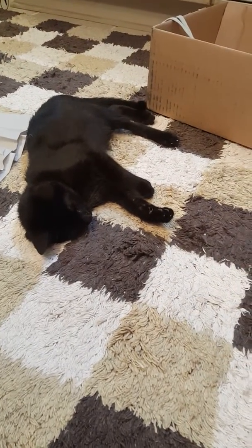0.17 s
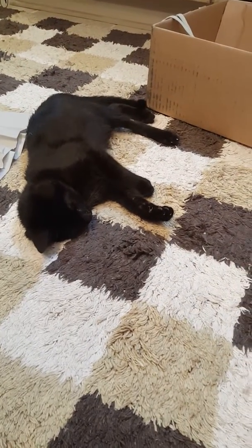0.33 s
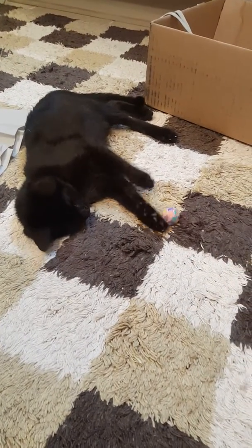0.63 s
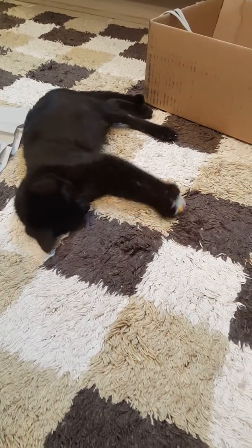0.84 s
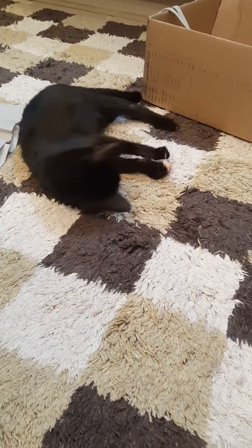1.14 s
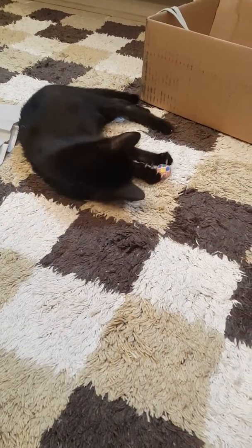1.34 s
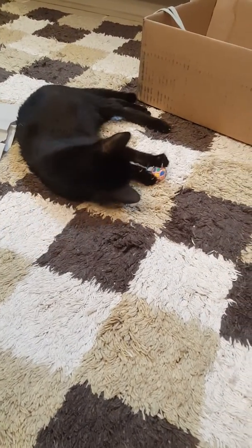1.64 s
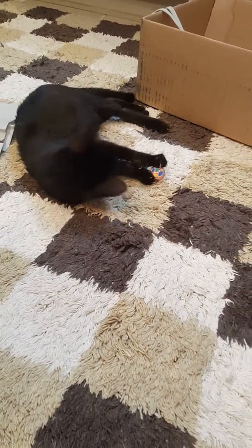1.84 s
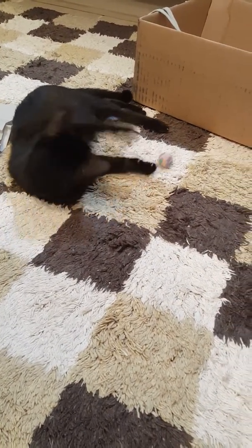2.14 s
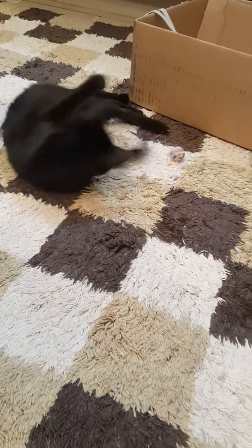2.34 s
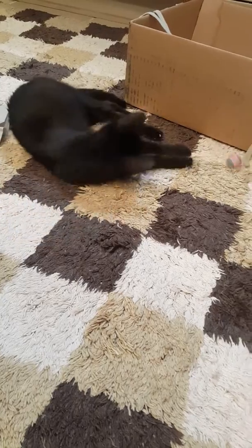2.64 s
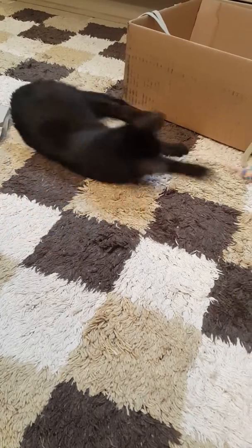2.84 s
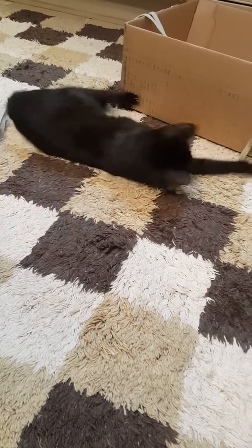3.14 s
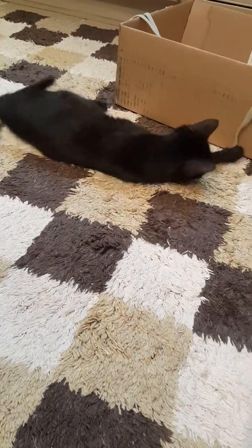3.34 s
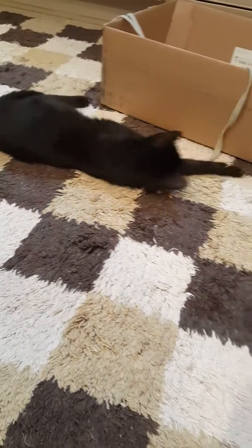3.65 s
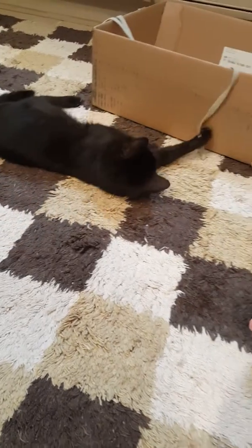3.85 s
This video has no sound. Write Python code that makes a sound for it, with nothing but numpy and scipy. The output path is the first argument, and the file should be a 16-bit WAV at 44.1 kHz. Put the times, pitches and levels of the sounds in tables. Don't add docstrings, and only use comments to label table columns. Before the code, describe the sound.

A cat purrs steadily on a rug, then paws and a ball knock a cardboard box.

```python
import sys
import numpy as np
from scipy import signal
from scipy.fft import rfft, irfft
from scipy.io import wavfile
from scipy.ndimage import uniform_filter1d

SR = 44100
rng = np.random.default_rng(int(sys.argv[2]) if len(sys.argv) > 2 else 0)


def undo_db(level):
    steps = np.asarray(level, float) / 20
    return 10 ** steps


def log_audio(samples):
    frames = np.atleast_2d(samples).T
    limited = np.clip(frames, -1, 1)
    pcm = np.round(limited * 32767).astype(np.int16)
    wavfile.write(sys.argv[1], SR, pcm)


N = 176400


def evened(x):
    return x / np.sqrt(np.mean(x ** 2) + 1e-20)


def read(points, hz):
    f, value = np.transpose(points)
    return np.interp(np.log(hz + 1), np.log(f + 1), value)


def add(mix, s, sound):
    part = mix[round(s * SR):][:len(sound)]
    part += sound[:len(part)]


def rings(table, t):
    return sum(undo_db(db - 60 * t / max(t60, .002)) * np.sin(2 * np.pi * hz * t) for hz, db, t60 in table)


def hush():
    # frequency in Hz, level in dB.
    hush_colour = [(30, 1), (70, -5.5), (130, 3), (320, -7), (720, -11.5), (1000, -14), (2000, -16),
                   (9900, -30.5), (14800, -25.5), (16000, -27.5)]
    # frequency in Hz, correlation in 0..1.
    hush_same = [(60, .85), (240, .85), (500, .4), (1200, .1), (3000, 0)]
    level_db, patch_db = -68, .8
    hz = np.fft.rfftfreq(1024, 1 / SR)
    a, b, c, d, patch = rng.standard_normal((N // 256 + 5, 513, 5)).T
    patch = evened(uniform_filter1d(uniform_filter1d(patch, 12, 0), 14, 1))
    same = np.clip(read(hush_same, hz), -1, 1)[:, None]
    left = a + 1j * b
    right = same * left + np.sqrt(1 - same ** 2) * (c + 1j * d)
    z = np.array([left, right]) * undo_db(read(hush_colour, hz)[:, None] + patch_db * patch)
    noise = signal.istft(z, nperseg=1024, noverlap=768)[1][:, :N]
    return undo_db(level_db) * evened(noise)


def room(x):
    # frequency in Hz, t60 in seconds.
    room_t60 = [(100, 0.21), (500, 0.31), (2000, 0.33), (8000, 0.2)]
    taps = np.zeros((2, SR // 2))
    at = np.arange(260, SR // 2 - 20, 20)
    at = at + rng.integers(0, 20, (2, len(at)))
    np.put_along_axis(taps, at, rng.choice([-1., 1.], at.shape), 1)
    hz, t, z = signal.stft(taps, SR, nperseg=256)
    near = np.clip(1 - hz / 900, 0, .97)[:, None]
    z[1] = near * z[0] + np.sqrt(1 - near ** 2) * z[1]
    decay = undo_db(-60 * t / read(room_t60, hz)[:, None])
    tail = signal.istft(z * decay, SR, nperseg=256)[1]
    return signal.fftconvolve(x[None], tail / np.linalg.norm(tail[0]), axes=1)[:, :N]


def ports(x):
    # frequency in Hz, left minus right in dB.
    lean = [(100, 0), (250, -.5), (450, 2), (700, 0), (1300, 2), (2300, 5), (4500, 2), (8000, -5),
            (13000, -2)]
    lead_s = .00016
    hz = np.fft.rfftfreq(N, 1 / SR)
    half = undo_db(read(lean, hz) / 2) * np.exp(1j * np.pi * hz * lead_s)
    return irfft(rfft(x) * np.array([half, 1 / half]), N)


def rug():
    # start in seconds, level in dB, frequency in Hz.
    ticks = [(2.242, -67, 5550), (2.284, -54, 5700), (2.325, -55.5, 6000), (2.367, -57, 6000),
             (2.387, -56, 6700), (2.696, -53, 8400), (2.882, -58, 7900), (3.031, -37.5, 7930),
             (3.457, -50, 8300), (3.508, -59, 6700), (3.565, -55, 7900)]
    # centre in seconds, length in seconds, level in dB, frequency in Hz, width in Hz.
    brushes = [(.6, .2, -76, 400, 40), (.92, .07, -75, 1920, 90), (.93, .2, -77, 2900, 900),
               (1.5, .12, -74, 430, 50), (2.47, .12, -82, 7500, 1500), (2.52, .12, -66, 156, 30),
               (2.828, .11, -75, 1900, 150), (2.95, .15, -72, 3120, 90), (2.952, .14, -70, 1900, 1500),
               (3.493, .067, -67, 336, 60), (3.53, .27, -73, 2000, 1400)]
    tick_rise_s = .0006
    out, t = np.zeros(N), np.arange(400) / SR
    for s, db, hz in ticks:
        tick = rings([(hz, db, .004), (hz * 1.22, db - 7, .003)], t)
        add(out, s, tick * np.minimum(t / tick_rise_s, 1))
    f = np.fft.rfftfreq(12000, 1 / SR)
    for mid, length, db, hz, width in brushes:
        noise = rng.standard_normal(12000)
        noise = evened(irfft(rfft(noise) / (1 + ((f - hz) / width) ** 2)))
        noise = noise[:round(length * SR)]
        add(out, mid - length / 2, undo_db(db) * noise * np.hanning(len(noise)))
    return out


def rattle():
    # start in seconds, level in dB, t60 in seconds, tilt in dB per octave.
    rattles = [(2.5816, -34, 0.016, -3), (2.586, -47.5, 0.49, -13.5), (3.0326, -46, 0.036, -5.5),
               (3.036, -58, 0.45, -1), (3.174, -56.5, 0.078, -5.5), (3.209, -58, 0.21, -2),
               (3.2327, -34.5, 0.04, -0.5), (3.237, -41.5, 0.19, -2.5), (3.249, -38.5, 0.094, -0.5),
               (3.7705, -30, 0.029, -3), (3.776, -43.5, 0.14, 1), (3.793, -42, 0.048, 2),
               (3.852, -47, 0.05, 0.5)]
    # frequency in Hz, level in dB.
    rattle_colour = [(530, -3), (900, -13), (2200, -11.5), (4700, -25), (6800, -22.5), (8500, -14),
                     (10000, -24), (16000, -27)]
    top_hz, grain_db = 15700, 3.54
    out, t = np.zeros((2, N)), np.arange(SR // 2) / SR
    hz = np.fft.rfftfreq(len(t), 1 / SR)
    band = hz ** 2 / (hz ** 2 + 800 ** 2) / (1 + (hz / top_hz) ** 40)
    for s, db, t60, tilt_db in rattles:
        a, b, grain = rng.standard_normal((3, len(t)))
        colour = undo_db(read(rattle_colour, hz) + tilt_db * np.log2(hz / 3000 + 0.0072)) * band
        noise = evened(irfft(rfft([a, b]) * colour))
        noise = noise * undo_db(grain_db * evened(uniform_filter1d(grain, 90)))
        dull = irfft(rfft(noise) / (1 + (hz / 3200) ** 4))
        treble = (noise - dull) * undo_db(-40 * (t / t60) ** 2)
        both = (dull[0] + treble) * undo_db(db - 60 * t / t60)
        add(out[0], s, both[0])
        add(out[1], s, both[1])
    return out


def box():
    # frequency in Hz, level in dB, t60 in seconds.
    wall = [(116.2, -1.5, 0.17), (185.3, -4.5, 0.22), (239, 3, 0.069), (287, -8, 0.16), (385, -5.5, 0.1),
            (435.5, -2, 0.059), (469, -7.5, 0.088), (530, -34, .15), (653, -35, 0.23), (747, 0.5, 0.031),
            (830, -18, 0.032), (995, -24, 0.074)]
    flap = [(107, -14.5, 0.18), (182.8, -12, 0.205), (287, -18, 0.089), (476, -5, 0.29), (543, -11.5, 0.11),
            (639, 9, 0.043), (728, -19, 0.22), (782, -24, 0.26), (1180, -21.5, 0.28), (1370, -2.5, 0.028),
            (1480, -8, 0.044), (2194, -6.5, 0.04), (2880, -39, 0.14)]
    rim = [(155, -26, 0.25), (203, -11, 0.086), (270, -10, 0.12), (495, -4.5, 0.26), (565, -0.5, 0.075),
           (733, -2.5, 0.1), (816, 1, 0.11), (874, -2, 0.065), (1085, -11, 0.11), (1260, -8, 0.075),
           (1390, -24, 0.044), (1570, -11, 0.09), (2070, -17, 0.046), (2350, -4, 0.11)]
    corner = [(168, 1, 0.073), (273.4, -8, 0.18), (535, -11, 0.15), (626, -4, 0.061), (795, 0, 0.024),
              (1350, 1, 0.024), (2190, -12, 0.049)]
    # start in seconds, level in dB, contact in seconds.
    wall_hits = [
        (2.5813, -25.5, 0.0008),
        (2.5853, -31, 0.0014),
        (2.628, -48, 0.00059),
        (3.172, -41, 0.0012),
        (3.184, -42.5, 0.002),
        (3.205, -43, 0.0032),
        (3.717, -48, 0.0046),
        (3.738, -50, 0.0059),
    ]
    flap_hits = [
        (3.232, -25.5, 0.00016),
        (3.262, -56, 0.00027),
    ]
    rim_hits = [
        (3.770, -34.5, 0.00045),
        (3.794, -40, 0.00048),
        (3.815, -48, 0.00068),
        (3.95, -73, 0.005),
        (3.983, -71.5, 0.0024),
    ]
    corner_hits = [
        (3.031, -41, 0.00018),
        (3.066, -50.5, 0.00048),
    ]
    wobble_db, wobble_s, rise_cycles = 5, .0088, .12
    out, t = np.zeros(N), np.arange(SR // 2) / SR
    for panel, hits in (wall, wall_hits), (flap, flap_hits), (rim, rim_hits), (corner, corner_hits):
        for s, db, contact in hits:
            push = np.sin(np.pi * np.clip(t[:400] / contact, 0, 1))
            steps = rng.standard_normal((len(panel), 64)) * np.minimum(np.arange(64) / 4, 1)
            tone = np.zeros(len(t))
            for mode, step in zip(panel, steps):
                rise = 1 - np.exp(-t * mode[0] / rise_cycles)
                wobble = undo_db(wobble_db * np.interp(t / wobble_s, np.arange(64), step))
                tone += rings([mode], t) * rise * wobble
            add(out, s, -undo_db(db) * signal.oaconvolve(tone, push / push.sum()))
    return out


def throat_rings(table, pitch, t):
    return rings([(hz * pitch, db, 2.2 / width) for hz, width, db in table], t)


def purr():
    # first cycle in s, last cycle in s, low pulse in dB, bright pulse in dB, gap
    # between in s.
    purrs = [(.012, .192, -54, -55, .0125), (.233, .310, -54, -55, .014), (.350, .584, -52, -52, .0138),
             (.623, .745, -54, -52, .0125), (.782, .821, -50, -48.5, .0142), (.863, .983, -54, -53, .0138),
             (1.022, 1.135, -55, -47, .0148), (1.177, 1.261, -57, -46, .0135),
             (1.300, 1.377, -57, -49, .0135), (1.460, 1.543, -51, -53, .013),
             (1.589, 1.719, -51, -51, .0128), (1.760, 1.844, -54, -50, .017),
             (1.922, 2.080, -54, -51, .016), (2.120, 2.285, -56, -48, .016), (2.327, 2.370, -56, -51, .015),
             (3.434, 3.472, -62, -55, .019), (3.513, 3.666, -60, -51, .0135)]
    cycles = [6, 3, 7, 4, 2, 4, 4, 3, 3, 3, 4, 3, 5, 5, 2, 2, 5]
    # frequency in Hz, width in Hz, level in dB.
    low_pulse = [(155, 40, -7), (238, 32, 1), (420, 110, -17), (690, 95, -4)]
    bright_pulse = [(245, 38, -3), (430, 100, -16), (705, 105, 3)]
    hard_pulse = [(255, 48, -1), (430, 100, -15), (745, 125, 4), (900, 200, -9)]
    snap = [(1150, 300, -16), (1600, 400, -11), (1950, 400, -7)]
    # from in seconds, to in seconds.
    air_out = [(1.01, 1.42), (1.9, 2.42), (3.4, 3.7)]
    level_db, uneven_db, soft_start_db, soft_end_db = -4, 1.2, -6, -4
    jitter_s, pause_s, pitch_spread = .0004, .048, .02
    swell_s, hard_swell_s = .0018, .001
    snap_from_db, snap_growth, snap_in_db = -46, .8, -6
    out, t = np.zeros(N), np.arange(3000) / SR
    gaps_s = np.array(purrs)[1:, 0] - np.array(purrs)[:-1, 1]
    pause = np.r_[False, gaps_s > pause_s, True]
    for (first, last, low_db, bright_db, gap), count, before, after in zip(purrs, cycles, pause, pause[1:]):
        for u, r in zip(np.linspace(0, 1, count), rng.standard_normal((count, 6))):
            s = first + u * (last - first) + jitter_s * r[0]
            soft_db = before * soft_start_db * (1 - u) ** 8 + after * soft_end_db * u ** 8
            going_out = any(a < s < b for a, b in air_out)

            flap = throat_rings(low_pulse, 1 + pitch_spread * r[1], t)
            flap = flap * np.sin(np.pi / 2 * np.minimum(t / swell_s, 1))
            add(out, s, -undo_db(low_db + soft_db + uneven_db * r[2]) * flap)

            throat, swell, side = (hard_pulse, hard_swell_s, 1) if going_out else (bright_pulse, swell_s, -1)
            pitch = 1 + pitch_spread * r[3]
            db = bright_db + soft_db + uneven_db * r[4]
            edge_db = snap_growth * (db - snap_from_db) + snap_in_db * (not going_out)
            edge = undo_db(edge_db) * throat_rings(snap, pitch, t)
            body = throat_rings(throat, pitch, t) * np.sin(np.pi / 2 * np.minimum(t / swell, 1))
            add(out, s + gap + jitter_s * r[5], side * undo_db(db) * (body + edge))
    return undo_db(level_db) * out


def scene():
    purr_wet_db, box_wet_db, purr_pan_db = -13, -6.5, .6
    cat = purr()
    knocks = box() + rug() + rattle()
    no_bass = signal.butter(4, 80, "high", fs=SR, output="sos")
    knocks = signal.sosfilt(no_bass, knocks)
    wet = room(undo_db(purr_wet_db) * cat + undo_db(box_wet_db) * knocks[0])
    pan = undo_db(np.array([[purr_pan_db], [-purr_pan_db]]) / 2)
    cat_pair = np.array([cat, np.roll(cat, 5)]) * pan
    return cat_pair + ports(knocks) + wet + hush()


def low_pass(x):
    return signal.sosfilt(signal.butter(12, 16450, fs=SR, output="sos"), x)


def record(dry):
    cut = signal.sosfilt(signal.butter(2, 70, "high", fs=SR, output="sos"), dry)
    return low_pass(cut - .0004)


dry = scene()
out = record(dry)
log_audio(out)
```